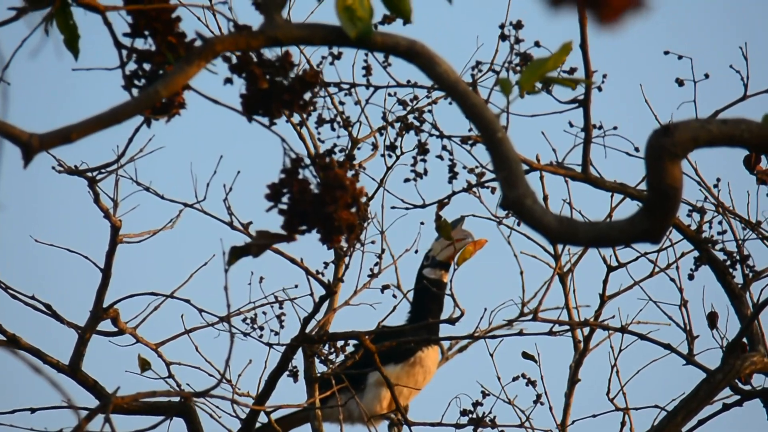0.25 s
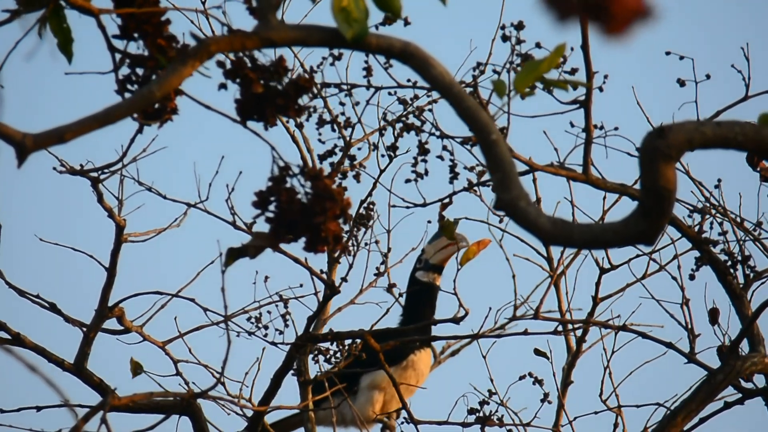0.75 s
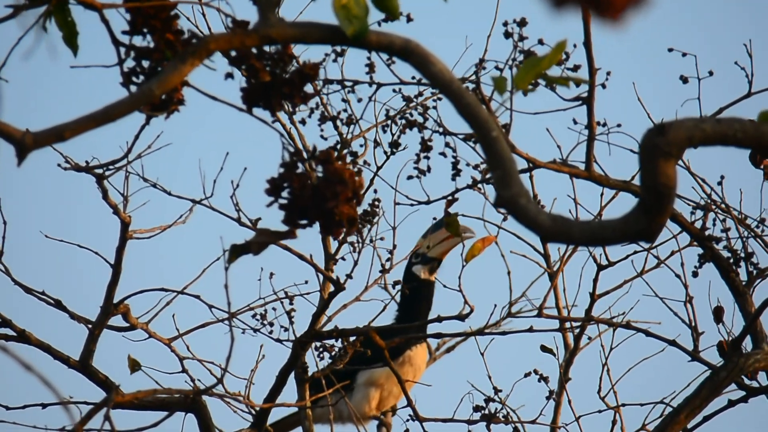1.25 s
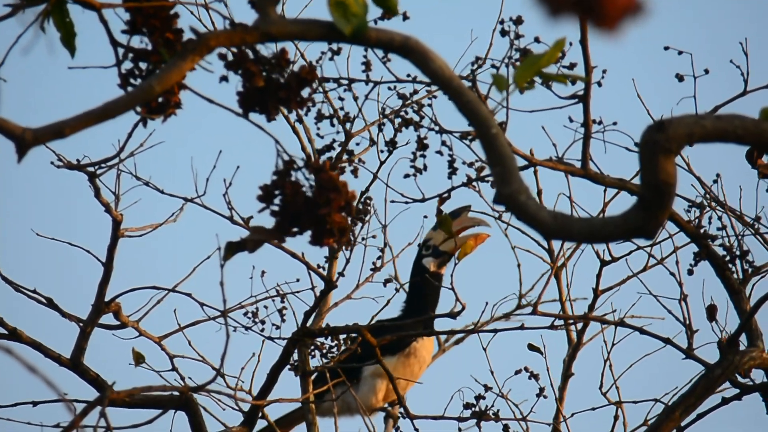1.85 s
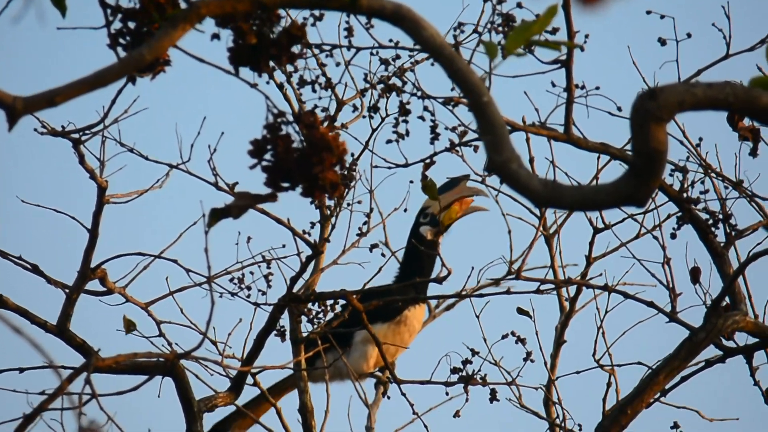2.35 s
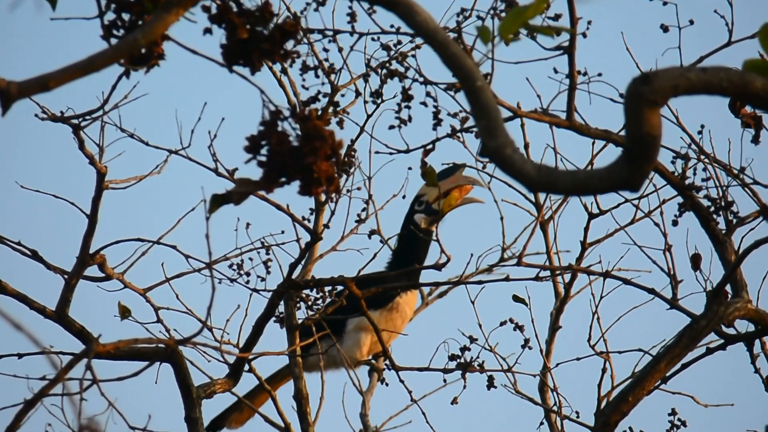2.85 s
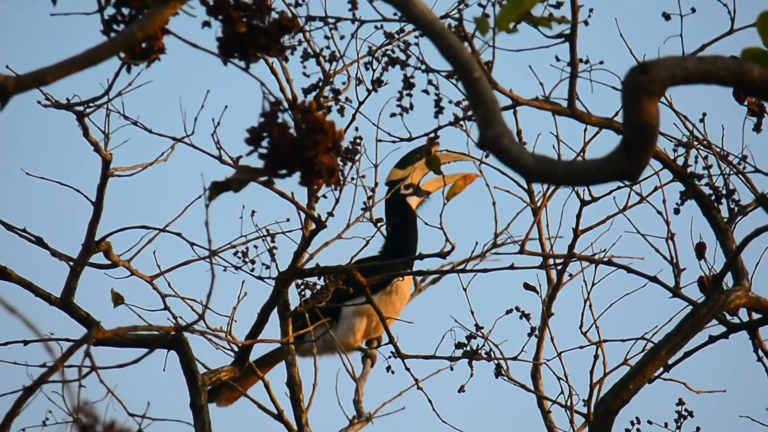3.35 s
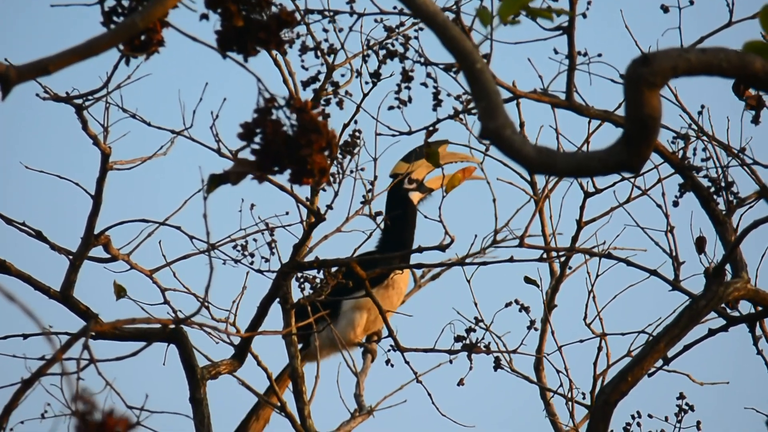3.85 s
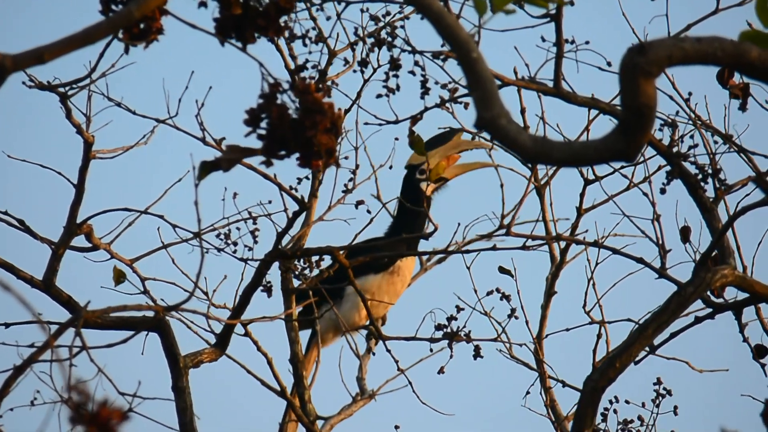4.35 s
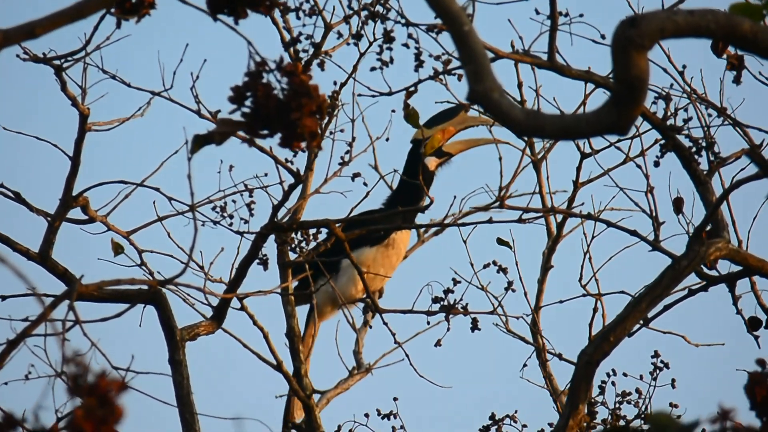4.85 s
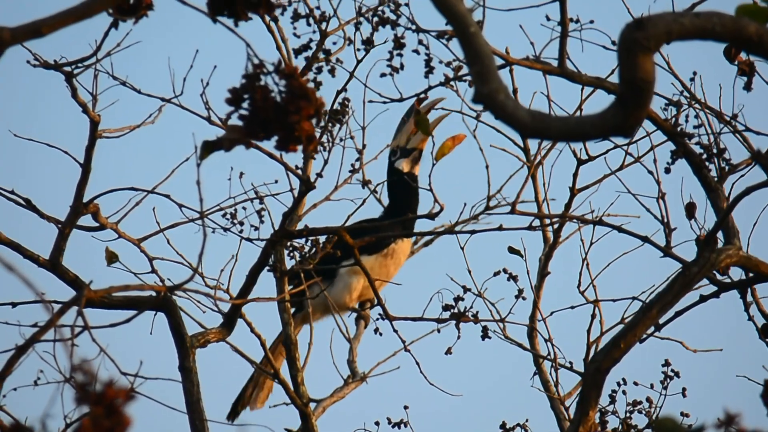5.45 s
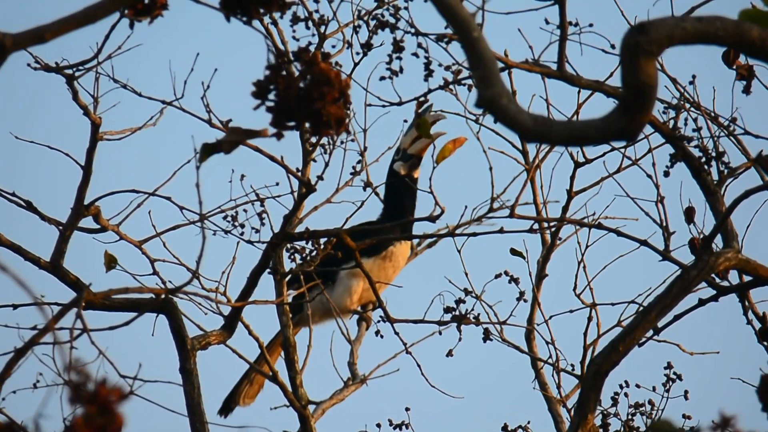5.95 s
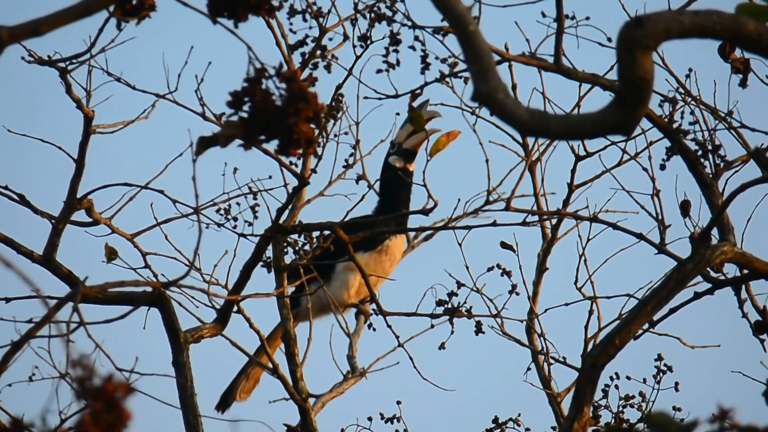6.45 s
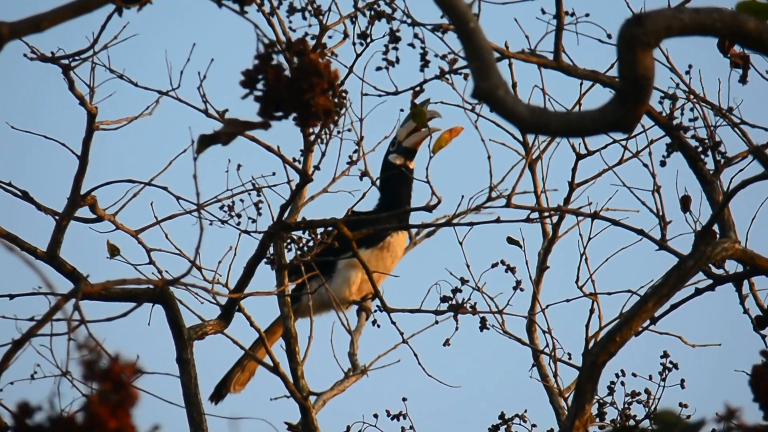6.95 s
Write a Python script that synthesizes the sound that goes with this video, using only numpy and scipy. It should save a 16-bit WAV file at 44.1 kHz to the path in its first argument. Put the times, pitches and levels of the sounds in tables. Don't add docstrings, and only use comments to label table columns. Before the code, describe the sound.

Outdoors, a microphone at some distance from a tree picks up gentle air and very faint insects. Soft far-off pips come first, then a short rough grunt. A big bird launches into nine even, raspy barks, each leaping up, cracking into a buzzing two-toned squawk and dropping off. Thin low whistles of indrawn air fill the gaps and a woody echo trails. It closes with a cracked, wavering yelp and a light leaf rustle.

```python
import sys
import numpy as np
from scipy import signal
from scipy.fft import rfft, irfft, next_fast_len
from scipy.io import wavfile
from scipy.ndimage import uniform_filter1d

SR = 44100
rng = np.random.default_rng(int(sys.argv[2]) if len(sys.argv) > 2 else 0)


def to_wav(sig):
    pcm = np.clip(np.atleast_2d(sig), -1, 1) * 32767
    pcm = np.round(pcm).astype(np.int16)
    wavfile.write(sys.argv[1], SR, pcm.T)


def gain_from_db(level_db):
    decades = np.asarray(level_db, float) / 20
    return 10 ** decades


N = 317520
T = np.arange(N) / SR


def hornbill():
    # (start [s], end [s], pitch as the bill opens [Hz], top pitch [Hz], level [dB])
    cries = [
        (1.473, 1.732, 1202, 1257, -23),
        (2.019, 2.292, 1238, 1268, -20.5),
        (2.511, 2.756, 1236, 1265, -25),
        (2.961, 3.204, 1259, 1300, -21),
        (3.449, 3.74, 1250, 1278, -25),
        (3.957, 4.222, 1198, 1285, -23.5),
        (4.47, 4.724, 1195, 1225, -27),
        (4.929, 5.169, 1183, 1210, -27),
        (5.361, 5.615, 1190, 1253, -23),
    ]
    # (beat [Hz], level against held part [dB], rasp share [dB],
    # half-beat lines [dB], dip before the crack [dB])
    solos = [(860, -1.5, -3, 2, -3), (880, -1, -2, 1, -3), (887, 0.5, 2, -8, -4.5), (879, -2, -4, -7, -4.5),
             (800, -2, -2, -12, -1.5), (900, -1, -4.5, -5.5, -5.5), (884, -1, 6, -2, -5),
             (815, 1, -5, -12, 2.5), (900, -3.5, -4, -3, -7)]
    # (joins [s], quits [s], top beat [Hz], beat lines [dB], half-beat lines [dB])
    duets = [(1.545, 1.684, 794, 7, -7.5), (2.1, 2.241, 795.5, 7.5, -24), (2.574, 2.716, 900, -4.5, -3),
             (3.063, 3.147, 770, 3.5, -40), (3.522, 3.692, 860, 8, -13), (4.088, 4.172, 667.4, 4.5, -35),
             (4.531, 4.672, 869.6, -8, -2.5), (5.039, 5.122, 821, -18, 2), (5.411, 5.575, 926, 0, -2.5)]
    # (climb until the crack [s], onset [dB], rasp share in duet [dB], 3.5-7 kHz [dB], over 7 kHz [dB])
    mouths = [(0.047, -27, -11.5, -7.5, -7.5), (.039, -24.5, -13.5, -6, -14.5), (.052, -25, -6.5, -4, -14),
              (.042, -24, -9.5, -5, -13), (.029, -29.5, -12, -12, -18.5), (.048, -27, -12.5, -15, -20.5),
              (0.051, -27.5, -4, -8, -13), (.106, -29, -4, -12.5, -15.5), (.045, -25.5, -10.5, -7, -10.5)]
    # (time [s], pitch [Hz], beat [Hz], level [dB], beat lines [dB], rasp share [dB])
    grunt = [(1.199, 676, 976, -54, -15.0, -3), (1.219, 759, 994, -27.5, -28, -13),
             (1.229, 1007, 1004, -35, -19, -0.5), (1.258, 974, 973, -32.5, -68, 1),
             (1.285, 900, 900, -46, -10.0, -19)]
    yelp = [(5.883, 926.5, 700, -28, -18, -4.5), (5.908, 1388, 700, -24, -17, 2.5),
            (5.917, 1046, 700, -24.5, 7, -8), (5.938, 1068, 688, -25, -4, 3),
            (5.946, 1124, 694, -35.5, -50, -39), (5.99, 1081, 700, -30.5, -32, -7.5),
            (6.026, 1050, 700, -22, 30, 0), (6.038, 1420, 700, -29, -6, -3),
            (6.085, 900, 700, -28, -25, -13)]
    # (time [s], half-beat lines [dB], 3.5-7 kHz [dB], over 7 kHz [dB])
    grunt_gape = [(1.225, -14, -11.5, -14.5), (1.237, -24, -5, -8), (1.262, -8, -14, -20)]
    yelp_gape = [(5.911, 7, -7, -19), (5.935, -23, -6.5, -22), (5.949, -42, 9.5, 0), (5.985, -9, -1, -18),
                 (6.068, -16.0, -20.5, -31)]
    # (1.5 kHz [dB], 4 kHz [dB], upper treble [dB])
    poses = [(18.5, -17, 9), (7.5, -1.5, 3), (4.5, -4.5, 3), (5, -8.5, 6.5), (4, -2.5, 10), (7, 4.5, -10),
             (2.5, -1, -8), (5.5, -7.5, -17.5), (3, -11, -17.5), (5, 9, -5.5), (2, 3.5, 12.5)]
    # (gains voice [s], top [s], top pitch [Hz], level [dB])
    gasps = [
        (1.317, 1.364, 803, -57),
        (1.792, 1.882, 954, -45.5),
        (2.369, 2.39, 832, -60),
        (2.805, 2.846, 878, -51),
        (3.243, 3.313, 1070, -44.5),
        (3.837, 3.849, 908, -50),
        (4.273, 4.291, 977, -44.5),
        (4.775, 4.8, 858, -58),
        (5.248, 5.295, 900, -51),
        (5.67, 5.695, 940, -45),
    ]
    # (time [s], peak level [dB], frequency [Hz])
    cracks = [(1.52, -19.5, 2670), (2.0544, -19, 2510), (3.0037, -14, 2590), (3.4782, -24, 2480),
              (4.0039, -15.5, 2482), (4.182, -22, 2580), (4.5182, -14.5, 2600), (4.676, -21.5, 2486),
              (5.032, -14.5, 2630), (5.108, -18.5, 2540), (5.4044, -13.5, 2606)]
    out = np.zeros(N)
    calls = [(grunt, grunt_gape), *map(controls, cries, solos, duets, mouths), (yelp, yelp_gape)]
    for (table, gape), pose in zip(calls, poses):
        add(out, cry(table, gape, pose), table[0][0] - .002)
    for (last, _), (coming, _), row in zip(calls, calls[1:], gasps):
        table = indrawn(last[-1][0], coming[0][0], *row)
        add(out, gasp(table), table[0][0])
    for s, db, hz in cracks:
        add(out, gain_from_db(db) * blip(hz, .013, 1.5, -13), s - .005)
    return out


def controls(call, solo, duet, mouth):
    start, end, open_hz, top_hz, db = call
    solo_hz, solo_db, solo_rasp_db, solo_half_db, dip_db = solo
    joins, quits, beat_hz, beat_db, half_db = duet
    climb_s, onset_db, rasp_db, mid_db, top_db = mouth
    rasp_path_db = (-2.5, -4, -10.5, -0.5, -11)
    start_hz, crack_hz, rise_s = 643.5, 1294.7, .04
    sag_hz, solo_beat_db = 29.5, -14
    t = np.arange(start, end, .002)
    burst, dip = start + 0.0094, start + 0.65 * climb_s
    cracks, sags, falls = start + climb_s, end - .048, end - 0.037
    opens = cracks + 0.0113
    crest = opens + 0.653 * (sags - opens)
    at = [start, burst, dip, opens, crest, sags, falls, end]
    both = np.clip(np.minimum(t - joins, quits - t) / 0.008 + .5, 0, 1)

    climbed = (1 - np.exp((start - t) / rise_s)) / (1 - np.exp(-climb_s / rise_s))
    rise = start_hz + (crack_hz - start_hz) * climbed
    bow = np.interp(t, [opens, crest, sags], [np.sqrt(abs(top_hz - open_hz)), 0, np.sqrt(sag_hz)])
    fall = np.interp(t, [sags, falls, end], [top_hz - sag_hz, 1050, 900])
    hz = np.where(t < cracks, rise, np.where(t < sags, top_hz - bow ** 2, fall))

    level = np.interp(t, at, [onset_db - 8.5, onset_db, onset_db + dip_db, db + solo_db,
                              db, db - 1.5, db - 4.5, db - 4.5])
    rasp = np.interp(t, [*at[:3], cracks, *at[3:]],
                     [*rasp_path_db[:3], rasp_path_db[2], solo_rasp_db, solo_rasp_db,
                      rasp_path_db[3], *rasp_path_db[3:]])
    solo_beat = solo_hz * (1 - (1 - .3) * np.exp(-(t - start) / .025))
    arch = np.clip((2 * t - joins - quits) / (quits - joins), -1.3, 1.3) ** 2
    beat = np.where(t < joins, solo_beat, beat_hz - 90.56 * arch)
    table = [t, hz, beat, level + 3 * both,
             solo_beat_db + (beat_db - solo_beat_db) * both, rasp + (rasp_db - rasp) * both]

    half = np.interp(t, [burst, dip, opens, quits, end], [-7, -19, solo_half_db, solo_half_db, -13.5])
    gape_at = [burst, start + 0.033, start + 0.061, crest, sags, falls]
    mid = np.interp(t, gape_at, [-8, 4.5, -0.5, 0, 0, -2.5])
    top = np.interp(t, gape_at, [-12.5, -0.5, -5, 0, 0, -5.2])
    gape = np.transpose([t, half + (half_db - half) * both, mid_db + mid, top_db + top])
    return np.transpose(table), gape[3:]


def cry(table, gape, pose):
    partial_db = [9.5, 9, 9, -0.5, -9.5, 1.5]
    lifted_db = [8.5, 3, 7.5, -1, -5]
    # (centre [Hz], width [Hz], gain [dB])
    throat_bells = [(1250, 1660, -4.5), (1983, 106, 5.5), (2587, 1390, 6.5), (3990, 750, 1), (4760, 860, 4),
                    (5410, 3000, -1.5), (9210, 2200, -6), (12700, 2500, -43)]
    # (time from start [s], half-beat [dB], mid [dB], top [dB])
    shut_bill = (-0.01, -7, -18.5, -34)
    s, *columns = np.transpose(table)
    t = np.arange(s[0] - .002, s[-1] + 0.0052, 1 / SR)
    smooth = int(0.0056 * SR)
    hz, beat_hz, db, beat_db, rasp_db = (uniform_filter1d(np.interp(t, s, c), smooth) for c in columns)
    s, *columns = np.transpose([(s[0] + shut_bill[0], *shut_bill[1:]), *gape])
    half_db, mid_db, top_db = (np.interp(t, s, c) for c in columns)
    rasp = np.clip(gain_from_db(rasp_db), 0, .85)

    wavering_hz = hz * (1 + (.0025 + .015 * rasp ** 2) * wobble(len(t), 300))
    wavering_beat_hz = beat_hz * (1 + 0.057 * rasp ** 2 * wobble(len(t), 173))
    turn = np.exp(2j * np.pi * np.cumsum(wavering_hz) / SR)
    half = np.exp(1j * np.pi * np.cumsum(wavering_beat_hz) / SR)
    first, *upper = partials(turn, partial_db, count=15)
    plain = first + sum(upper)
    lifted = sum(partials(turn, lifted_db, count=13))
    twice = gain_from_db(beat_db - 25.5) / half ** 2
    tone = plain * (1 + gain_from_db(half_db) * (half + gain_from_db(-5) * half ** 3) + twice)
    tone = tone + gain_from_db(beat_db) * half ** 2 * lifted
    tone = tone + gain_from_db(beat_db) * half ** 4 * (upper[2] + gain_from_db(-50) * first)

    flutter = np.exp(1.6j * wobble(len(t), 600))
    smear = (sum(upper) + gain_from_db(-19) * first + gain_from_db(3.5) * half ** 2 * lifted) * flutter
    smear = smear + gain_from_db(4) * rng.standard_normal(len(t))

    tilt = points([(600, pose[0]), (1000, pose[0]), (1500, pose[0]), (2000, 0), (3200, 0), (4000, pose[1]),
                   (5200, 0), (6500, 3 + pose[2] / 2), (8500, 0), (13000, pose[2])])

    def escape(f):
        throat = np.sqrt(sum((gain_from_db(g) * bell(c, w)(f)) ** 2 for c, w, g in throat_bells))
        return tilt(f) * throat / (1 + (950 / f) ** 10) / (1 + (f / 13300) ** 16)

    tone, smear = (even(shaped(v.real, escape), 0.014) for v in (tone, smear))
    chest = gain_from_db(-30) * unit(shaped(rng.standard_normal(len(t)), bell(671, 350)))
    voice = np.sqrt(1 - rasp ** 2) * tone + rasp * (smear + chest)
    voice = voice + 1.3 * rasp * shaped(smear, lambda f: 1 / (1 + (5500 / f) ** 4))

    low = shaped(voice, lambda f: 1 / (1 + (f / 3500) ** 16))
    top = shaped(voice, lambda f: 1 / (1 + (7000 / f) ** 16))
    mid = voice - low - top
    closing_db = -8 * np.clip(1 - (t[-1] - t) / 0.16, 0, 1)
    voice = even(low, 0.033) + gain_from_db(mid_db) * even(mid, 0.036) + gain_from_db(top_db + closing_db) * even(top, 0.017)
    edge = np.clip((t - t[0]) / 0.0038, 0, 1) * np.clip((t[-1] - t) / 0.036, 0, 1)
    return voice * gain_from_db(db) * edge


def partials(turn, levels_db, count):
    last = len(levels_db) - 1
    return [gain_from_db(levels_db[min(k, last)]) * turn ** (k + 1) * np.exp(.4j * k * k) for k in range(count)]


def indrawn(after, before, voiced, top_s, top_hz, db):
    from_hz, to_hz, faint_db = 790, 770, -57
    t = np.arange(after + 0.017, before - 0.009, .002)
    rising = t < top_s
    place = np.where(rising, (t - top_s) / (top_s - t[0]), (t - top_s) / (t[-1] - top_s))
    hz = top_hz - (top_hz - np.where(rising, from_hz, to_hz)) * place ** 2
    full = db - 0.08 * (top_hz - hz) + 1.5 * np.maximum(place, 0) ** 2
    step = np.clip((t - voiced) / 0.0048, 0, 1)
    return np.transpose([t, hz - 0.615 * (hz - from_hz) * (1 - step), faint_db + (full - faint_db) * step])


def gasp(table):
    s, hz, db = np.transpose(table)
    t = np.arange(s[0], s[-1], 1 / SR)
    hz, db = (uniform_filter1d(np.interp(t, s, c), int(0.0027 * SR)) for c in (hz, db))
    phase = 2 * np.pi * np.cumsum(hz * (1 + 0.0103 * wobble(len(t), 46))) / SR
    effort = db + 46.5
    tone = np.sin(phase)
    tone = tone + gain_from_db(-0.5 + 0.91 * effort) * np.sin(2 * phase)
    tone = tone + gain_from_db(-7.5 + 0.85 * effort) * np.sin(3 * phase)
    unsteady = gain_from_db(db + 0.84 * wobble(len(t), 40))
    return np.sqrt(2) * unsteady * tone * signal.windows.tukey(len(t), .1)


def blip(hz, length_s, upper, upper_db):
    t = np.arange(int(length_s * SR)) / SR
    tone = np.sin(2 * np.pi * hz * t) + gain_from_db(upper_db) * np.sin(2 * np.pi * upper * hz * t)
    return np.sin(np.pi * t / length_s) ** 2 * tone


def far_bird():
    # (time [s], peak level [dB])
    pips = [
        (0.014, -45),
        (0.22, -49),
        (0.422, -45),
        (0.627, -51),
        (0.825, -48),
        (1.016, -45),
    ]
    out = np.zeros(N)
    for s, db in pips:
        add(out, gain_from_db(db - 4.5) * blip(957, 0.03, 1.5, -5.5), max(s - .01, 0))
    return out


def wood(x):
    # (centre [Hz], time to fall 60 dB [s], level [dB])
    echo_bands = [(700, 1.3, -52), (1554, 0.66, -11.5), (3360, 0.45, -10.5), (5870, 0.42, -11.5),
                  (10700, 0.2, -7.5)]
    t = np.arange(int(1.0 * SR)) / SR
    tail = 0
    for hz, t60, db in echo_bands:
        noise = rng.standard_normal((2, len(t)))
        mid, side = shaped(noise, lambda f: np.exp(-(np.log2(f / hz) / 0.63) ** 2))
        fade = np.exp(-np.log(1000) * t / t60) * np.clip(t / 0.0013, 0, 1)
        width = min(0.26 * (hz / 3000) ** 0.6, 1.5)
        pair = mid + width * np.array([side, -side])
        tail = tail + gain_from_db(db) * pair * fade / np.sqrt(np.sum(fade ** 2))
    return signal.fftconvolve(x[None], tail, axes=1)[:, :N]


def hush():
    # (frequency [Hz], level per Hz [dB])
    air_colour = [(21, -38), (36, -8), (145, -7.5), (757, -5.5), (951, -5.5), (1030, -6.5), (1390, -7.5),
                  (1660, -8), (15500, -29.5)]
    # (frequency [Hz], side minus mid [dB])
    air_width = [(150, -8), (1500, -2)]
    # (time [s], spread [s], level [dB])
    rustles = [
        (.55, 0.061, -64.5),
        (6.6, 0.061, -57.5),
    ]
    # (time [s], spread [s], level [dB])
    gusts = [
        (.97, 0.009, -52),
        (5.6, 0.04, -55),
        (5.9, 0.066, -63),
    ]
    mid, side = shaped(rng.standard_normal((2, N)), points(air_colour))
    side = shaped(side, points(air_width))
    air = gain_from_db(-58.5 + 0.092 * wobble(N, 9)) * (mid + np.array([side, -side])) / np.std(mid)
    leaves = unit(shaped(rng.standard_normal((2, N)), bell(6500, 9000))) * gain_from_db(0.83 * wobble(N, 60))
    insects = unit(shaped(rng.standard_normal((2, N)), bell(6480, 500))) * gain_from_db(-73)
    wind = unit(shaped(rng.standard_normal((2, N)), bell(78, 130))) * gain_from_db(np.array([[-2.5], [0]]))
    air = air + insects + leaves * sum(gain_from_db(db) * bump(s, w) for s, w, db in rustles)
    return air + wind * sum(gain_from_db(db) * bump(s, w) for s, w, db in gusts)


def shaped(x, gain):
    size = next_fast_len(x.shape[-1])
    f = np.arange(size // 2 + 1) * SR / size + 1
    return irfft(rfft(x, size) * gain(f), size)[..., :x.shape[-1]]


def points(table):
    hz, db = np.transpose(table)
    return lambda f: gain_from_db(np.interp(np.log(f), np.log(np.maximum(hz, 1)), db))


def bell(hz, width_hz):
    return lambda f: 1 / (1 + (2 * (f - hz) / width_hz) ** 2)


def unit(x):
    return x / np.sqrt(np.mean(x ** 2))


def even(x, span_s):
    return x / np.sqrt(uniform_filter1d(x ** 2, int(span_s * SR)) + 1e-12)


def wobble(n, rate_hz):
    return unit(shaped(rng.standard_normal(n), bell(0, rate_hz)))


def bump(s, spread_s):
    return np.exp(-.5 * ((T - s) / spread_s) ** 2)


def add(out, x, s):
    i = int(s * SR)
    out[i:i + len(x)] += x[:len(out) - i]


def scene():
    # (time [s], extra treble to the wood [dB])
    bill_turn = [(1.4, -8), (3.2, -13), (3.5, 6), (4.1, 8), (4.6, 0), (5.05, 6), (5.45, -2)]
    birds = hornbill() + far_bird()
    treble = shaped(birds, lambda f: 1 / (1 + (3600 / f) ** 6))
    aside = gain_from_db(np.interp(T, *np.transpose(bill_turn))) * treble
    return birds + wood(birds + aside) + hush()


def low_pass(x):
    return signal.sosfilt(signal.butter(12, 15670, fs=SR, output="sos"), x)


def record(dry):
    dull = shaped(dry, lambda f: 1 / (1 + (f / 15300) ** 8) / (1 + (40 / f) ** 4))
    return low_pass(dull)


dry = scene()
out = record(dry)
to_wav(out)
```